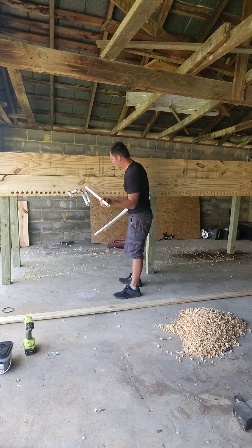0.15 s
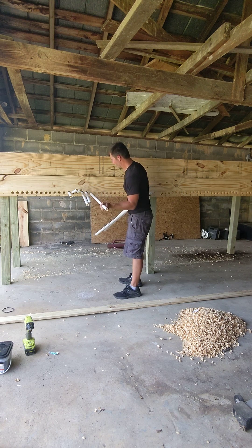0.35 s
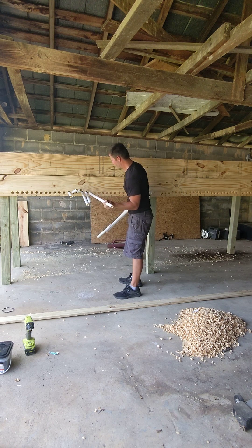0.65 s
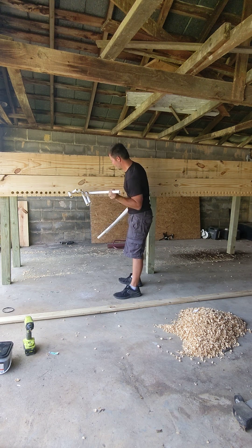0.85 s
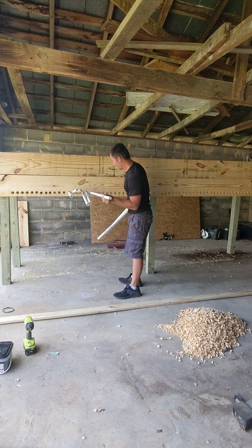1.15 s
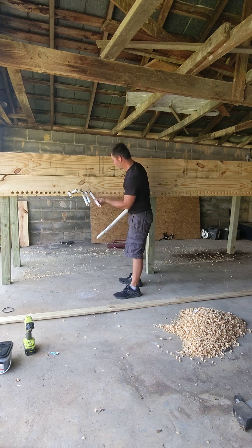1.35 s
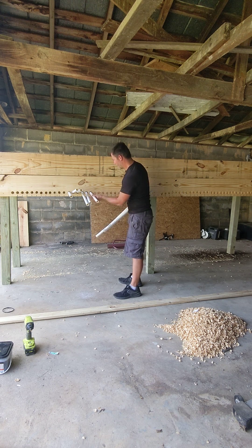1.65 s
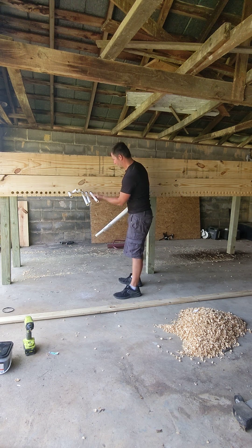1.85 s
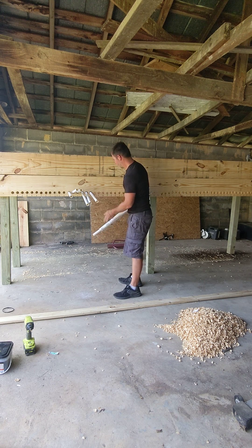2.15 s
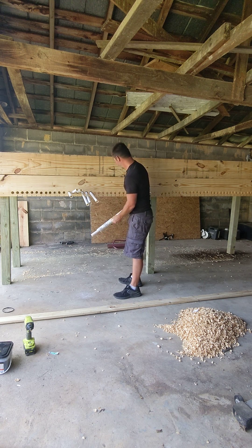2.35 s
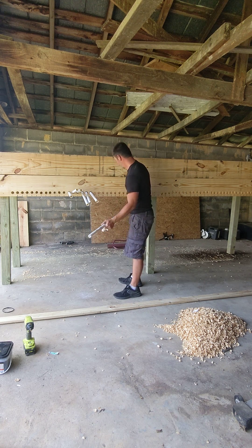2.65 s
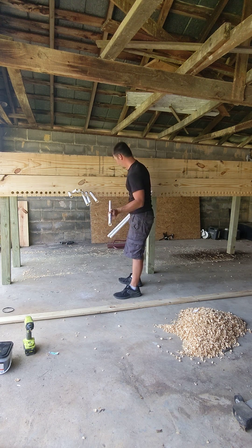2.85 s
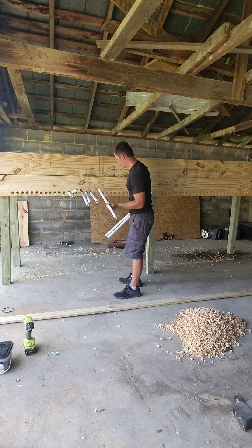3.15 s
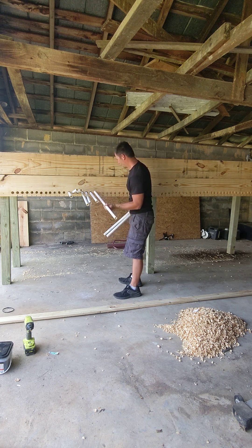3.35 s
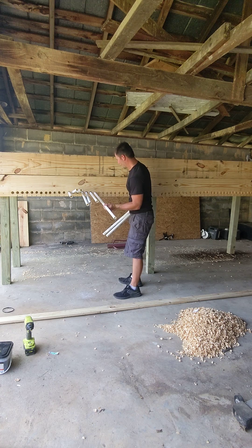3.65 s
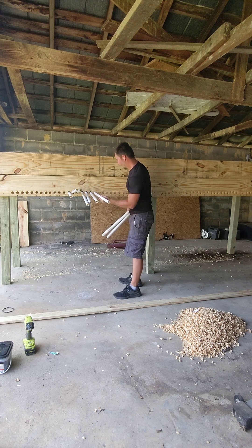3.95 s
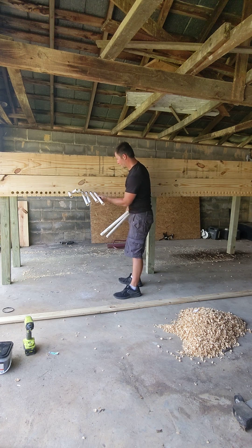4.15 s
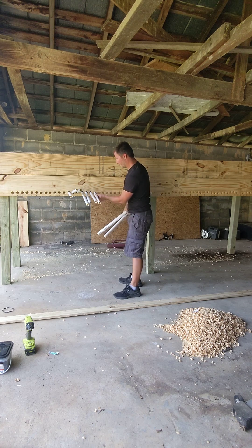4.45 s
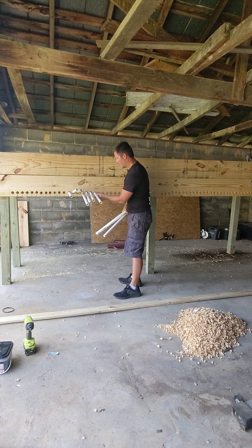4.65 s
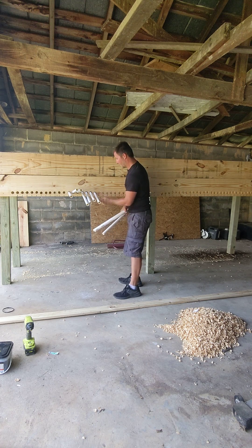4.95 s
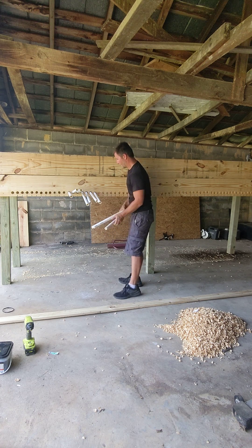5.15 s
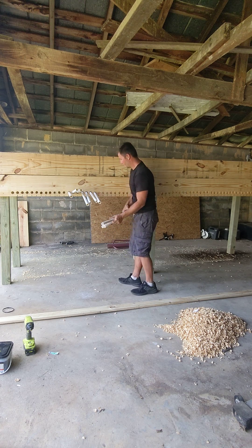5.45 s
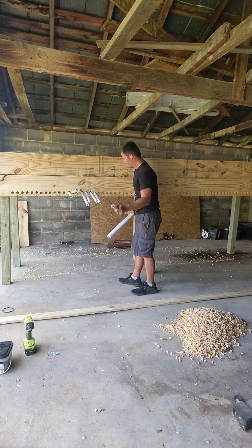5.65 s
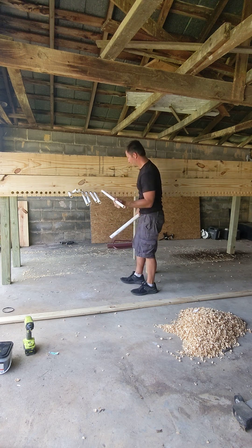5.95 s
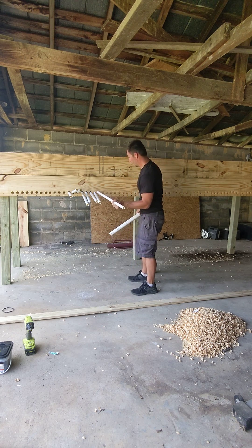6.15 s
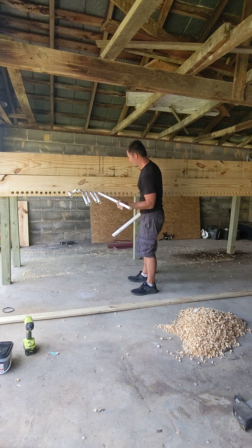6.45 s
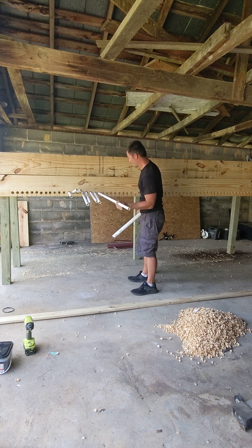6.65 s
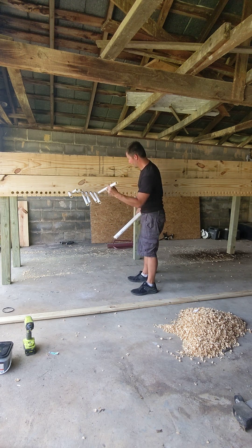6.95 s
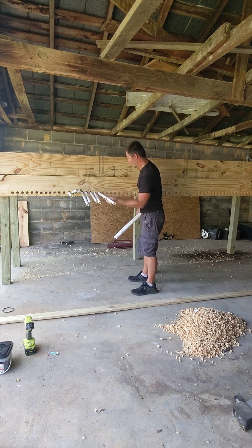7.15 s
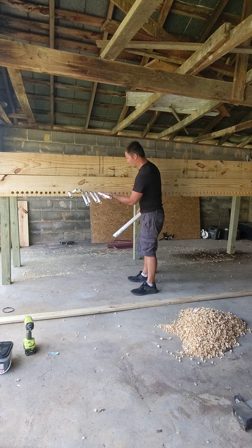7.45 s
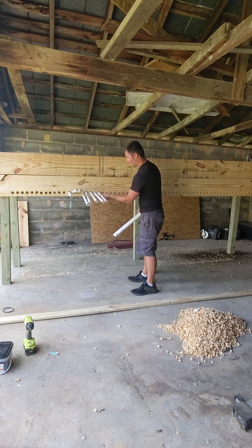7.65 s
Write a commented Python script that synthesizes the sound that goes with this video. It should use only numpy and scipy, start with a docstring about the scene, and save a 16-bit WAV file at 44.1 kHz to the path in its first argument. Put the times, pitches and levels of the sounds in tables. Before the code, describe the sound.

Heard from a few metres off in a hard, open garage: hollow plastic pipes thud against wood, slide with swishing and scraping noises, and snap lightly at their edges. The work comes in uneven bursts with pauses. Outside, a low engine drone wavers and fades later on, while a raspy insect buzz swells and stops each second over soft rumble and steady hiss.

```python
"""Open concrete garage: plastic pipes are pushed one by one into holes in a wooden beam, a few metres away.
Knocks and a few soft scuffs ring modes; sliding is coloured, slightly uneven noise; edges click as snaps.
A low hollow rumble and rubbing rises and sinks as coloured noise over a roar and an even hiss.
Outside, a distant engine hums in firing orders and unevenly loses speed.
An insect buzzes about once a second as pulsed noise in wing resonances; one faint peep is narrow noise."""
import sys
import numpy as np
from scipy import signal
from scipy.fft import rfft, irfft, next_fast_len
from scipy.io import wavfile

SR = 44100
rng = np.random.default_rng(int(sys.argv[2]) if len(sys.argv) > 2 else 0)


def to_wav(sig):
    """Store sig (one row per channel, or 1-D mono) as 16-bit WAV at the path in sys.argv[1].

    Samples outside -1..1 are clipped; the rate is SR.
    """
    pcm = np.clip(np.atleast_2d(sig), -1, 1) * 32767
    pcm = np.round(pcm).astype(np.int16)
    wavfile.write(sys.argv[1], SR, pcm.T)  # frames by channels


N = 343539
TIME = np.arange(N) / SR
DIRECT_LAG_S = 0.000455  # left port after right

# hollow ring heard with the pipe, coloured by the microphone port: freq_hz, width_hz, rel_db
HOLLOW_MODES = [(616.4, 89, -0.5), (649, 33, -2), (677, 38, -4), (703.5, 25.6, 1), (759, 53, -2.5),
                (815, 62, -10.5), (900, 99, -18), (1248, 47, -17), (1315, 35, -12)]
# engine upper orders, fading as it slows: time_s, rel_db
UPPER_LEVEL = [(0, -58.5), (1.25, -57), (2, -60.5), (2.65, -58), (3.1, -64), (3.5, -74), (4.8, -65),
               (5.8, -90), (7.79, -85)]


def from_db(db):
    """Decibels to gain."""
    return 10 ** (np.asarray(db) / 20)


def rms_one(x):
    """Scale to unit power over all ports."""
    return x / np.sqrt(np.mean(x ** 2) + 1e-20)


def in_time(points):
    """A (time_s, value) curve, sample by sample."""
    time_s, value = np.transpose(points)
    return np.interp(TIME, time_s, value)


def gains(points, size):
    """A (freq_hz, db) table as gains on the FFT grid, interpolated over log frequency."""
    freq_hz, db = np.transpose(points)
    grid_hz = np.fft.rfftfreq(size, 1 / SR)
    return from_db(np.interp(np.log(grid_hz + 1), np.log(freq_hz), db))


def colour(x, points):
    """Filter to a smooth spectrum."""
    size = next_fast_len(x.shape[-1] + SR // 10)
    return irfft(rfft(x, size) * gains(points, size), size)[..., :x.shape[-1]]


def highpass(x, order, cutoff_hz):
    """Butterworth high-pass."""
    return signal.sosfilt(signal.butter(order, cutoff_hz, "high", fs=SR, output="sos"), x)


def drift(rate_hz):
    """Random curve: straight lines between normal knots of spread 1."""
    knots = rng.standard_normal(int(N / SR * rate_hz) + 2)
    return np.interp(TIME * rate_hz, np.arange(len(knots)), knots)


def likeness(hz):
    """Correlation of a diffuse sound at the two ports."""
    # sound from all sides: freq_hz, correlation
    correlation = [(60, 0.91), (200, 0.97), (300, 0.94), (450, 0.96), (640, 0.53), (1000, -0.58),
                   (1400, -0.49), (2200, 0.014)]
    return np.clip(np.interp(hz, *np.transpose(correlation)), -1, 1)


def diffuse(size, direct=0):
    """Noise from all directions at two ports; a direct share reaches the right port first."""
    grid = next_fast_len(size)
    hz = np.fft.rfftfreq(grid, 1 / SR)
    mid, side, near = rfft(rng.standard_normal((3, grid)))
    alike = likeness(hz)
    field = np.sqrt(1 + alike) * mid + np.sqrt(1 - alike) * side * [[1], [-1]]
    field += direct * near * np.exp(-2j * np.pi * hz * DIRECT_LAG_S * [[1], [0]])
    return irfft(field, grid)[:, :size]


def stretch(noise, size):
    """A random piece of a long noise."""
    at = rng.integers(SR // 10, noise.shape[1] - size)
    return noise[:, at:at + size]


def resonate(x, modes):
    """Parallel resonances, each with its own share of the power."""
    out = 0
    for hz, width_hz, db in modes:
        edges_hz = [max(hz - width_hz / 2, 20), hz + width_hz / 2]
        band = signal.butter(2, edges_hz, "band", fs=SR, output="sos")
        out = out + from_db(db) * rms_one(signal.sosfilt(band, x))
    return rms_one(out)


def garage(rise_s, hold_s, t60_s, late_db):
    """Room envelope of a knock: reflections pile up, hold, fall quickly and leave a faint tail."""
    t = np.arange(SR // 2) / SR
    fall = from_db(-60 * np.maximum(t - hold_s, 0) / t60_s)
    tail = from_db(late_db - 60 * t / 0.6)  # tail T60 0.6 s
    return (1 - np.exp(-t / rise_s)) * (fall + tail)


def add(out, start_s, sound):
    """Mix a sound in at start_s."""
    at = max(round(start_s * SR), 0)
    out[:, at:at + sound.shape[1]] += sound[:, :N - at]


def engine(third_trim_db=1, upper_trim_db=1, waver_db=1.6):
    """Sines at multiples of the firing rate; all but the 2nd order waver in level on the way."""
    # time_s, firing_hz
    speed_curve = [(0, 37.3), (1.5, 38.2), (3, 38.1), (4.5, 35.4), (5.5, 36.4), (6.2, 34.8), (7.79, 35.8)]
    # 2nd order, the hum: time_s, level_db
    hum_curve = [(0, -56), (.75, -54.5), (1.15, -51), (1.4, -55.5), (2.3, -50.5), (2.65, -56.5),
                 (3.08, -47), (3.75, -56.5), (4.25, -47.5), (5.45, -52.5), (5.8, -60.5), (7.4, -64),
                 (7.79, -60)]
    # 3rd order: time_s, rel_db
    third_curve = [(0, -69), (2.2, -58.5), (3.4, -67.5), (3.95, -58), (4.6, -59.5), (5.3, -54.5),
                   (5.8, -64), (7.79, -61)]
    # upper orders: order, rel_db
    overtones = [(4, -0.5), (6, -17), (8, -12), (10, -22)]
    firing_hz = in_time(speed_curve) * (1 + 0.0017 * drift(5.97))
    turn = 2 * np.pi * np.cumsum(firing_hz) / SR
    upper_db = in_time(UPPER_LEVEL)

    out = from_db(in_time(hum_curve)) * np.sin(2 * turn)
    third_db = in_time(third_curve) + third_trim_db + waver_db * drift(6)
    out += from_db(third_db) * np.sin(3 * turn)
    for order, rel_db in overtones:
        level_db = upper_db + upper_trim_db + rel_db + waver_db * drift(3.7)
        phase = rng.uniform(0, 2 * np.pi)
        out += from_db(level_db) * np.sin(round(order) * turn + phase)
    # fainter drone just above the 4th order
    drone_db = upper_db - 5 + waver_db * drift(5.1)
    out += from_db(drone_db) * np.sin(4.45 * turn)
    return np.sqrt(2) * out  # RMS to peak


def background(rumble_trim_db=1, swell_db=3.5, roar_mean_db=-68.5, roar_follows=0.46, hiss_db=-67):
    """Coloured noise: low hollow rumble and rubbing, rising and sinking, engine roar and an even hiss."""
    # low hollow rumble and rubbing: time_s, rel_db
    rumble_curve = [(0, -64.5), (1.8, -63.5), (2.3, -57.5), (2.8, -66), (4.55, -60.5), (4.95, -64.5),
                    (5.4, -58.5), (5.75, -69), (7.79, -63.5)]
    # spectra of rumble and rubbing, engine roar and hiss: freq_hz, rel_db_per_hz
    rumble_colour = [(30, -18), (60, 1), (120, -12), (200, -3.5), (330, -12), (450, -5.5), (620, 3),
                     (760, 3), (900, -14.5), (1080, -14), (1220, -19.5), (1320, -5), (1450, -22),
                     (3000, -31.5)]
    roar_colour = [(25, -24), (60, 5.5), (150, 2), (300, -4), (450, -6), (700, -30), (1500, -47)]
    hiss_colour = [(900, -8), (1320, -1.5), (1700, -4.5), (2300, -2.5), (3200, -4), (5200, -7), (6900, -7),
                   (9000, -9.5), (10500, -17), (13500, -8.5), (16000, -11.5)]
    rumble_db = in_time(rumble_curve) + rumble_trim_db + swell_db * drift(14)
    rumble = from_db(rumble_db) * rms_one(colour(diffuse(N), rumble_colour))
    # roar takes a share of the upper orders' swing
    upper_db = in_time(UPPER_LEVEL)
    roar_db = roar_mean_db + roar_follows * (upper_db - upper_db.mean())
    roar = from_db(roar_db) * rms_one(colour(diffuse(N), roar_colour))
    hiss = highpass(colour(diffuse(N, direct=0.36), hiss_colour), 4, 900)
    return rumble + roar + from_db(hiss_db) * rms_one(hiss)


def insect(strokes_hz=59, buzz_s=0.43, buzz_db=-55, swell_db=13, release_s=0.03, whine_db=-9, high_hiss_db=-75):
    """Wing strokes pulse noise through wing resonances; every buzz swells, then stops."""
    # end_s
    buzz_ends = [0.014, 1.055, 2.063, 3.12, 4.195, 5.252, 6.298, 7.314]
    # wing resonances: freq_hz, width_hz, rel_db
    wing_modes = [(4002, 140, 0), (4140, 130, -4), (5030, 700, -2.5), (5670, 790, 0.5), (6820, 420, -4),
                  (6330, 1580, 2.5), (8020, 230, -5.5)]
    level = np.zeros(N)
    for end_s in buzz_ends:
        during = (TIME > end_s - buzz_s - 0.2) & (TIME < end_s + 0.3)
        t = TIME[during]
        to_go = np.maximum(end_s - t, 0) / buzz_s
        release = np.exp(-np.maximum(t - end_s, 0) / release_s)
        level[during] += from_db(buzz_db - swell_db * to_go ** 3.1) * release

    phase = 2 * np.pi * np.cumsum(strokes_hz * (1 + 0.06 * drift(30))) / SR
    pulses = 1 + 0.27 * np.cos(phase)
    rasp = resonate(diffuse(N, direct=0.43) * pulses, wing_modes[1:])
    # lowest resonance whines and throbs most deeply
    whine = resonate(diffuse(N, direct=1.0), [wing_modes[0]]) * pulses ** 2
    buzz = highpass(rasp + from_db(whine_db) * whine, 8, 3750)
    # faint, gently wavering high hiss around the insect's pitch
    high_hiss = resonate(diffuse(N, direct=0.5), [(6900, 690, -5), (6100, 3300, -4.5)])
    return level * rms_one(buzz) + from_db(high_hiss_db + drift(2.7)) * high_hiss


def struck(times_s, levels_db, modes, envelope, blur, vary_db=1.5):
    """Modes ring with new strengths at every start; scattered reflections blur them."""
    out, size = np.zeros((2, N)), len(envelope)
    hz, _, mode_db = np.transpose(modes)
    rings = np.exp(2j * np.pi * np.outer(hz, np.arange(size) / SR)) * envelope
    scattered = resonate(diffuse(3 * SR), modes)
    for start_s, level_db in zip(times_s, levels_db):
        # opposite phase shifts set each mode's port correlation
        apart = np.arccos(likeness(hz)) / 2 * rng.choice([-1, 1], len(hz)) * [[1], [-1]]
        gain = from_db(mode_db + vary_db * rng.standard_normal(len(hz)))
        phase = apart + 2 * np.pi * rng.random(len(hz))
        ringing = ((gain * np.exp(1j * phase)) @ rings).real
        reflections = stretch(scattered, size) * envelope
        sound = rms_one(ringing) + blur * rms_one(reflections)
        add(out, start_s, from_db(level_db) * rms_one(sound))
    return out


def knocks(beam_trim_db=-18, hollow_trim_db=-9, wall_trim_db=-11, crack_trim_db=-10):
    """Knocks and a few soft scuffs of pipe on beam: thud, hollow ring, wall clack and crack, mostly via the walls."""
    # knocks and soft scuffs: start_s, thud_rel_db, ring_rel_db, clack_rel_db, crack_rel_db
    contacts = [(0.357, -46.5, -48, -65, -56.5), (0.449, -20, -26, -48, -59.5),
                (1.005, -39, -42.5, -62, -73), (1.074, -41, -49, -69, -81), (1.15, -50, -51.5, -68, -76),
                (1.207, -35.5, -40.5, -57, -63), (1.444, -45, -53.5, -63.5, -68),
                (1.468, -31, -48.5, -74, -64), (1.779, -40.5, -52.5, -78, -79), (2.127, -54, -55, -69, -82),
                (2.209, -68, -60, -79, -77), (2.513, -50, -45, -66, -52.5), (2.601, -46.5, -47, -62, -51),
                (3.577, -47, -50.5, -84, -75), (3.734, -44, -48, -59.5, -67), (3.859, -23, -32, -43.5, -51),
                (4.521, -53.5, -54, -64.5, -68), (6.573, -44, -36, -52, -50.5),
                (6.96, -45, -47.5, -57, -66), (7.32, -48.5, -59.5, -71, -66), (7.607, -46, -52, -58.5, -53),
                (7.714, -41.5, -54.5, -82, -67)]
    # modes of beam and pipe wall: freq_hz, width_hz, rel_db
    beam_modes = [(116.2, 39, -13.5), (172.5, 12, -23), (206.5, 42, -2), (291.9, 50, -3), (349, 19, -8.5),
                  (383.3, 63, -6.5), (404.7, 37, 0), (452, 116, -1.5), (504.7, 32, 1), (544, 66, -8)]
    wall_modes = [(1433, 260, 5.5), (1570, 200, -7), (1880, 240, 2.5), (2170, 250, 1.5), (2660, 150, -6.5)]
    # contact crack: freq_hz, rel_db_per_hz
    crack_colour = [(500, -9), (950, 9), (1350, 2), (2000, -13), (3200, 4.5), (4200, -2), (7000, -7),
                    (11000, -18.5), (16000, -15)]
    times_s, thud_db, ring_db, clack_db, crack_db = np.transpose(contacts)
    thud = garage(rise_s=0.0038, hold_s=0.039, t60_s=0.27, late_db=-45)
    ring = garage(rise_s=0.004, hold_s=0.032, t60_s=0.25, late_db=-42)
    clack = garage(rise_s=0.002, hold_s=0.012, t60_s=0.25, late_db=-48)
    out = struck(times_s, thud_db + beam_trim_db, beam_modes, thud, blur=0.94)
    out += struck(times_s, ring_db + hollow_trim_db, HOLLOW_MODES, ring, blur=0.83)
    out += struck(times_s, clack_db + wall_trim_db, wall_modes, clack, blur=2.1)
    crack = colour(diffuse(2 * SR, direct=0.68), crack_colour)
    for start_s, rel_db in zip(times_s, crack_db):
        burst = rms_one(stretch(crack, len(clack)) * clack)
        add(out, start_s, from_db(rel_db + crack_trim_db) * burst)
    return out


def stroke_envelope(start_s, length_s, attack_s=0.026, release_s=0.041):
    """A stroke gathers speed, holds and dies away in the room."""
    t = np.maximum(TIME - start_s, 0)
    rise = np.minimum(t / attack_s, 1)
    fall = np.minimum(np.maximum(t - length_s, 0) / release_s, 20)
    return rise * np.exp(-fall)


def sliding(hollow_db=-8, fine_uneven_db=0.2, catch_db=2.0):
    """Plastic drags over wood: a rushing noise with slightly uneven catches, and a hollow ring along with it."""
    # pipe slides in its hole or along another: start_s, length_s, swish_db, scrape_db
    strokes = [(0.977, 0.15, -70, -65), (1.147, 0.11, -59, -58.5), (1.325, 0.23, -59, -76),
               (1.602, .16, -62, -67), (2.37, 0.095, -67, -65.5), (2.457, 0.076, -48.5, -53),
               (2.557, 0.11, -53, -58), (2.748, .08, -63, -76), (3.148, .36, -75, -88),
               (3.539, 0.021, -59, -61.5), (3.711, .035, -61, -61), (3.91, .03, -58.5, -66),
               (4.004, 0.42, -61.5, -63.5), (4.076, 0.026, -54, -56), (4.494, 0.18, -84, -67.5),
               (5.256, 0.018, -61, -56.5), (5.341, 0.064, -58, -60), (5.43, 0.055, -49, -65),
               (5.489, 0.055, -54, -50), (5.916, 0.08, -65, -57.5), (6.134, 0.094, -52.5, -51),
               (6.285, 0.021, -65, -76), (6.467, .12, -62, -59), (6.912, 0.054, -48.5, -50),
               (7.131, 0.21, -53.5, -60.5), (7.376, 0.3, -54.5, -65.5)]
    # smooth swish and coarse scrape: freq_hz, rel_db_per_hz
    swish_colour = [(1500, -30), (3500, -6), (5000, -4.5), (7000, 0.5), (8800, -0.5), (10700, -8.5),
                    (12500, -0.5), (14500, 2), (16000, -1)]
    scrape_colour = [(200, -44), (450, 3), (700, 11), (1050, -2), (1320, 8), (1700, 0.5), (2250, 7),
                     (2800, 3.5), (3400, 4), (5000, 0.5), (8000, 0.5), (15000, -30)]
    power = np.zeros((2, N))
    for start_s, length_s, *levels_db in strokes:
        power += np.outer(from_db(levels_db), stroke_envelope(start_s, length_s)) ** 2
    swish, scrape = np.sqrt(power)

    catches = from_db(fine_uneven_db * drift(700) + catch_db * drift(45))
    friction = diffuse(N, direct=0.31) * catches
    fine = rms_one(colour(friction, swish_colour))
    coarse = rms_one(colour(diffuse(N, direct=0.67) * catches, scrape_colour))
    hollow = resonate(friction, HOLLOW_MODES)
    return swish * fine + scrape * (coarse + from_db(hollow_db) * hollow)


def clicks(direct_db=10, room_db=-9, low_hz=3200, snap_s=0.00036):
    """Hard plastic edges snap: a bright noise burst reaches the right port first, reflections follow."""
    # start_s, rel_db
    snaps = [(1.169, -53), (2.477, -54), (3.578, -67), (3.741, -57), (3.858, -44), (5.279, -72),
             (5.4347, -37.5), (5.65, -51.5), (6.519, -45.5), (6.926, -50), (7.607, -48)]
    out = np.zeros((2, N))
    echoes = garage(rise_s=0.001, hold_s=0.0022, t60_s=0.22, late_db=-42)
    t = np.arange(len(echoes)) / SR
    scattered = diffuse(2 * SR)
    for start_s, rel_db in snaps:
        snap = rng.choice([-1, 1], len(t)) * np.exp(-t / snap_s)
        direct = np.array([np.interp(t - DIRECT_LAG_S, t, snap, left=0), snap])
        room = echoes * stretch(scattered, len(t))
        sound = from_db(direct_db) * direct + from_db(room_db) * room
        add(out, start_s, from_db(rel_db) * highpass(sound, 2, low_hz))
    return out


def peep():
    """One short, thin, husky note: narrow noise under a bell-shaped envelope."""
    # centre_s, half_width_s (to 1/e), pitch_hz, level_db
    note = (2.205, .03, 4300, -64)
    centre_s, half_width_s, pitch_hz, level_db = note
    envelope = np.exp(-((TIME - centre_s) / half_width_s) ** 2)
    return from_db(level_db) * envelope * resonate(diffuse(N), [(pitch_hz, 550, 0)])


def scene():
    """The work at the beam, and what is heard around it."""
    return engine() + background() + insect() + knocks() + sliding() + clicks() + peep()


def record(dry):
    """Two microphone ports differ in colour at equal total power; the top is cut."""
    # freq_hz, left_minus_right_db
    port_balance = [(60, -1.5), (220, 1), (380, 2.5), (520, 2.5), (660, 16.5), (790, 13), (1050, -1.5),
                    (1320, 6), (1900, 0), (4200, 1.5), (9500, 2.5), (12000, -8), (14500, -9)]
    size = next_fast_len(N + SR // 10)
    ratio = gains(port_balance, size)
    ports = np.array([ratio, np.ones_like(ratio)]) * np.sqrt(2 / (1 + ratio ** 2))
    heard = irfft(rfft(dry, size) * ports, size)[:, :N]
    top_cut = signal.ellip(12, 0.1, 80, 15900, fs=SR, output="sos")  # ripple_db, stop_db, cutoff_hz
    return signal.sosfilt(top_cut, heard)


dry = scene()
out = record(dry)
to_wav(out)
```